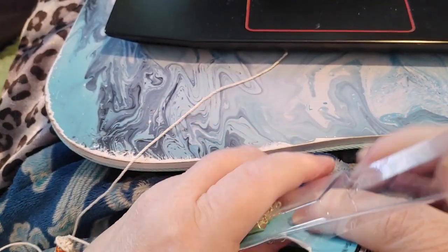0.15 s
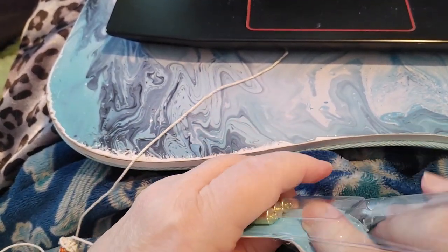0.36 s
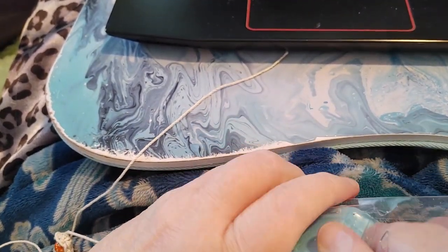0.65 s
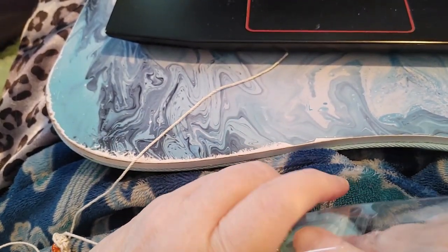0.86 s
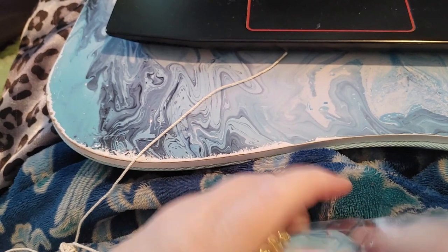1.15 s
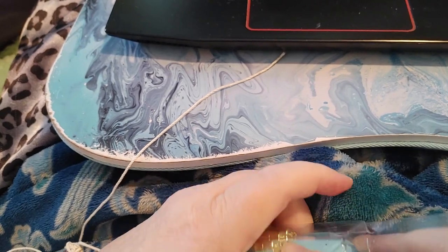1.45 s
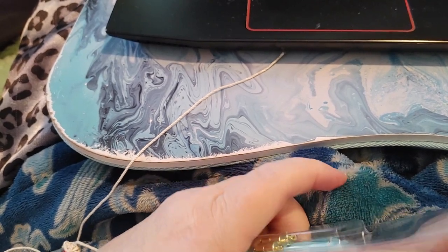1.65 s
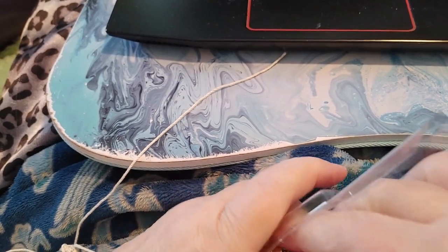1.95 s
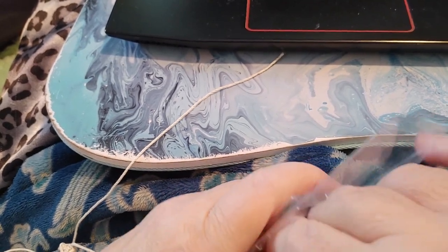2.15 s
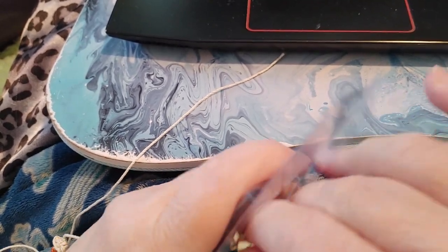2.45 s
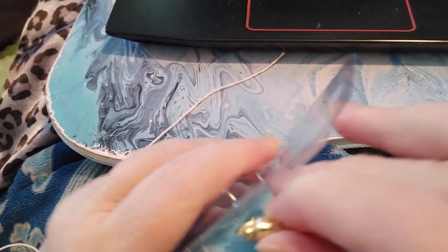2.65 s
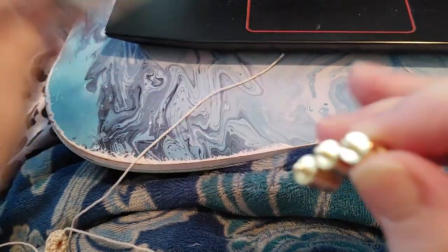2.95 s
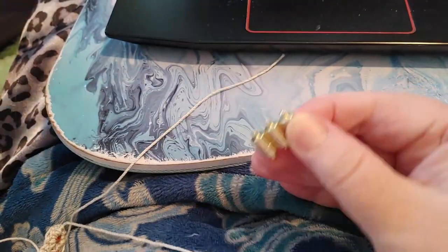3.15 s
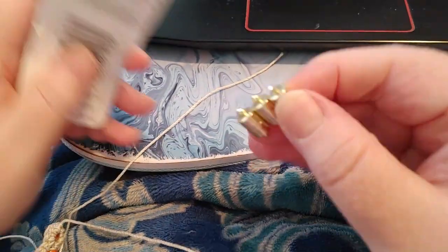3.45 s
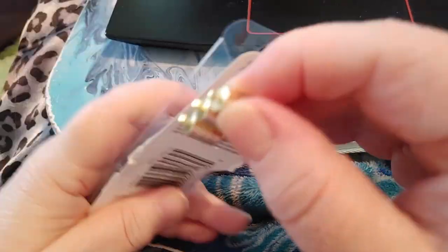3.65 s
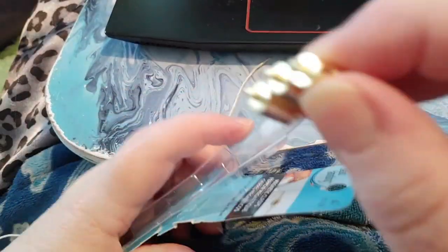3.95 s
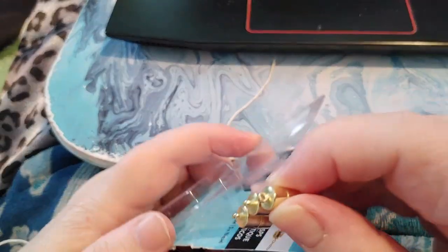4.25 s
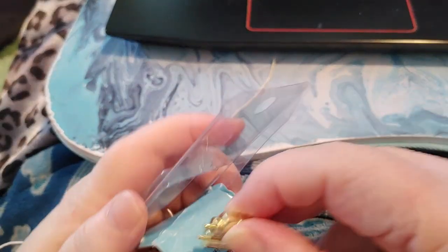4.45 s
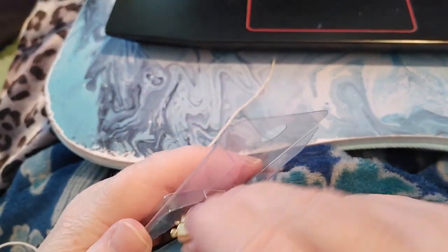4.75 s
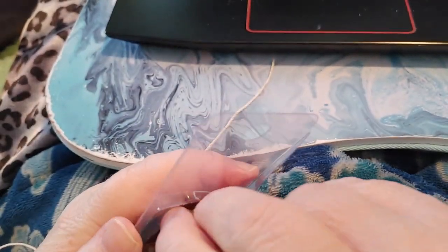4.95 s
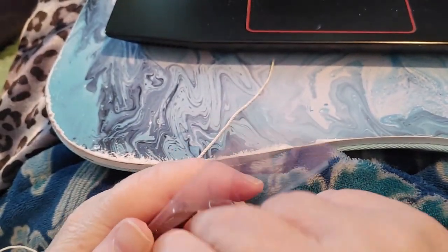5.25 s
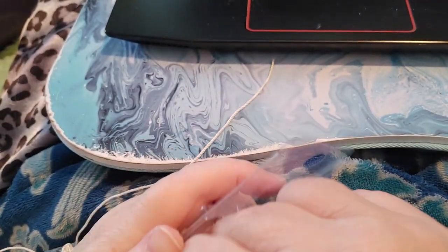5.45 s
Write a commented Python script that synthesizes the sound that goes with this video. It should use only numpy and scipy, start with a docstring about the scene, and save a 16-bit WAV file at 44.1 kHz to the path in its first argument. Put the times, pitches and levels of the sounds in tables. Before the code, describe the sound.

Hands bend a stiff clear plastic pack close by, with sharp snaps, crinkling and hollow knocks over a faint fan hum.

```python
"""Close to a phone, hands bend a stiff clear plastic pack; a laptop fan hums nearby in a quiet soft room.
A quick run of creases snaps and the film creaks twice in the first half second. The hardest snaps and hollow
knocks come between 1.1 and 2.9 s; then mostly faint crackle, one hard snap near 4.6 s and a few late creases.
Creases are ringing noise bursts, creaks are click trains, crackle is gated noise, knocks are decaying sines,
fan and air are filtered noise. The right channel runs a few milliseconds late."""
import sys
import numpy as np
from scipy import signal
from scipy.fft import rfft, irfft, next_fast_len
from scipy.io import wavfile
from scipy.ndimage import uniform_filter1d

SR = 44100
rng = np.random.default_rng(int(sys.argv[2]) if len(sys.argv) > 2 else 0)


def store_wav(level_fs):
    """Save 16-bit WAV to argv[1]."""
    pcm = np.round(np.clip(np.atleast_2d(level_fs), -1, 1) * 32767)
    wavfile.write(sys.argv[1], SR, pcm.T.astype(np.int16))


N = 247401

# Creases buckling: t/s, crack level/dB, crack colour f/Hz, thump level against the crack/dB
SNAPS = [(0.0206, -14.5, 4300.0, -17), (0.0638, -29, 4500, -20), (0.116, -25, 5800.0, -4),
         (0.2240, -23, 6500.0, -14), (0.2310, -24, 6500, -35), (0.2405, -24, 6500, -33),
         (0.3281, -24, 5800.0, -8), (0.3431, -26, 6200.0, -6), (0.3592, -23, 7000.0, -9),
         (0.3662, -25, 6500, -8), (0.3751, -23, 6500, -10), (0.3846, -22.5, 6400.0, -9.5),
         (0.3935, -25.5, 6400.0, -8), (0.401, -24, 7000, -25), (0.4116, -19, 6400.0, -37),
         (0.4203, -22, 5000.0, -32), (0.431, -12, 4300.0, -21.5), (0.6171, -25.5, 6000.0, -7),
         (0.6778, -26, 4800, -15), (0.9759, -30.5, 7600.0, -9), (1.0532, -26.5, 6100.0, -35),
         (1.0905, -31, 3000, -4), (1.1112, -7.5, 7300.0, -7.5), (1.124, -17.5, 6800.0, -13),
         (1.2487, -24.5, 2800.0, -22.5), (1.261, -22.5, 4500.0, -15), (1.2992, -4, 6700.0, -7),
         (1.3065, -4.5, 6000, -8), (1.3425, -17, 6500, -12), (1.4429, -25.5, 6700.0, -11),
         (1.6059, -25, 5300.0, -5.5), (1.6603, -17, 4200, -25), (1.6631, -13, 3600, -18),
         (1.6985, -14, 2500, -16), (1.978, -27.5, 5400.0, -15.5), (2.299, -10.5, 4100.0, -13),
         (2.3522, -22, 8300.0, -16), (2.4359, -15, 6700.0, -22.5), (2.4396, -5.5, 6600.0, -8),
         (2.6595, -31.5, 2500.0, -4.0), (2.7645, -17, 6600.0, -6), (2.8346, -17, 5500.0, -8),
         (2.8765, -20.5, 4700.0, -9), (2.9271, -39.5, 6900.0, -15), (3.0082, -22, 11000.0, -31),
         (3.0235, -38, 7500, -31), (3.918, -39.5, 5000.0, -5), (4.0365, -30.5, 2600.0, -18),
         (4.32, -33.5, 4680, -6.5), (4.4438, -43, 2380, -22), (4.4923, -36, 2700, -19),
         (4.5935, -5, 5600, -11), (4.6507, -30.0, 4800.0, -10), (4.8003, -33, 6600.0, -14),
         (4.9375, -25, 2500.0, -10), (5.1054, -35.5, 5900.0, -13), (5.206, -40, 2500, -20),
         (5.242, -26, 4200.0, 2.5), (5.3185, -33, 6500, -25), (5.3815, -27, 5500.0, -8),
         (5.3885, -29, 5500, -8), (5.4152, -23, 5700.0, -8.5)]
# Pack and fan at the microphones: t/s, drop of the pack on the right/dB, fan level before its left-right tilt/dB
PLACE = [(0, 0.5, -69), (1.1, 3, -65.5), (2.3, 3, -63.5), (2.9, 6.5, -63), (3.2, 10, -64.5),
         (3.6, 7.5, -67.5), (4.3, 7, -61), (5.61, 6, -63.5)]


def amp(db):
    """Amplitude factor of a level in dB."""
    return 10 ** (np.asarray(db) / 20)


def unit(x):
    """x scaled to an rms of one."""
    return x / np.sqrt(np.mean(x ** 2) + 1e-20)


def along(points, hz):
    """Read a curve of (f/Hz, value) points on a log frequency axis."""
    f, v = np.transpose(points)
    return np.interp(np.log(hz + 1), np.log(f + 1), v)


def curves(rows):
    """One value per sample for each column after the time."""
    s, *cols = np.transpose(rows)
    return [np.interp(np.arange(N) / SR, s, c) for c in cols]


def filtered(x, response):
    """Filter x by a complex response of frequency."""
    m = next_fast_len(x.shape[-1] + 4096)
    spectrum = rfft(x, m) * response(np.fft.rfftfreq(m, 1 / SR))
    return irfft(spectrum, m)[..., :x.shape[-1]]


def mode(f, hz, width_hz):
    """Response of one causal resonance, one at its peak."""
    return 1j * f * width_hz / (hz * hz - f * f + 1j * f * width_hz)


def two_mics(pair):
    """Mix two unrelated signals so that the microphones agree most in the bass and differ in the treble."""
    # Likeness of the two microphones: f/Hz, correlation
    likeness = [(300, 0.77), (1200, 0.36), (2500, 0.17), (6000, 0.4)]

    def mid_and_side(hz):
        turn = np.arccos(np.clip(along(likeness, hz), 0, 1)) / 2
        return np.array([np.cos(turn), np.sin(turn)])

    mid, side = filtered(pair, mid_and_side)
    return np.array([mid + side, mid - side])


def patchy(depth_db, frames, size):
    """Two noises whose colour drifts in narrow patches of random gain, shared by both."""
    z = signal.stft(rng.standard_normal((2, N)), nperseg=size)[2]
    field = uniform_filter1d(rng.standard_normal(z.shape[1:]), size=3, axis=0)
    field = uniform_filter1d(field, frames, axis=1)
    noise = signal.istft(z * amp(depth_db * unit(field)), nperseg=size)[1]
    return unit(noise[:, :N])


def click(hz, thump_db, after_db=-27, after_t60=0.065):
    """A buckling crease: a crack round its colour, a dull push of the card and an afterrustle."""
    t = np.arange(4096) / SR
    noise = rng.standard_normal((2, 2, len(t)))
    # every fold leaves differently sized panels free to ring
    panels = np.minimum(hz * np.exp(.3 * rng.standard_normal(5)), 12500)
    blow = (1 - np.exp(-t / .0006)) ** 2 * amp(-60 * t / .0048)
    afterrustle = amp(after_db - 60 * t / after_t60)
    edge = hz / 15000  # small stiff creases also spit at the very top

    def plastic(f):
        body = mode(f, hz, .8 * hz) ** 2
        top = edge * mode(f, 11500, 3500)
        return body + top + sum(mode(f, p, .04 * p) for p in panels)

    crack = filtered(noise[0] * (blow + afterrustle), plastic)
    thump = filtered(noise[1] * blow ** 2, lambda f: mode(f, 600, 1800))
    head = len(t) // 20  # levels are set on the opening burst
    return crack / np.std(crack[:, :head]) + amp(thump_db) * thump / np.std(thump[:, :head])


def snaps():
    """Single creases giving way, each with its own burst of crack and thump."""
    crest_db = 9.5  # allowance for the peak of a crack over its rms
    out = np.zeros((2, N + SR))
    for s, db, hz, thump_db in SNAPS:
        out[:, round(s * SR):][:, :4096] += amp(db - crest_db) * click(hz, thump_db)
    return out[:, :N]


def creaks():
    """Film sticks and slips on film: like clicks in a train whose rate drifts while it swells and fades."""
    # Creaks: start t/s, end t/s, slip rate at start f/Hz, at end f/Hz, level/dB, colour f/Hz
    slip_trains = [(0.301, 0.323, 430, 400, -39, 7000), (.492, 0.553, 430, 900, -33, 5360)]
    out = np.zeros((2, N))
    for start, end, rate0, rate1, db, hz in slip_trains:
        part = np.linspace(0, 1, round((end - start) * SR))
        rate = rate0 + (rate1 - rate0) * part ** 2
        slips = np.diff(np.floor(np.cumsum(rate) / SR), prepend=-1)
        swell = np.sqrt(np.abs(np.sin(np.pi * part)))
        train = slips * swell * amp(db + 2 * rng.standard_normal(len(part)))
        sound = signal.fftconvolve(train[None], click(hz, -25, after_db=-30), axes=1)
        out[:, round(start * SR):][:, :sound.shape[1]] += sound
    return out


def crackle():
    """Tiny creases of unequal size gate a rubbing noise that rings film and card; snaps rustle more evenly."""
    # Fingers pressing the pack: peak t/s, crackle level/dB, time to swell 20 dB/s,
    # time to fade 20 dB/s, card level against the film/dB
    squeezes = [(0.045, -40, .4, .04, -5), (.11, -43, .05, .13, -4), (.235, -43, .04, .06, -11),
                (.455, -46, .05, .1, -18), (.524, -38, .1, .065, -6), (.673, -33, .058, .035, -12),
                (.845, -38, .07, .06, -8), (1.075, -43, .15, .05, -22), (1.285, -34, .045, .05, 0),
                (1.312, -24, .012, .07, -2), (1.345, -29, .08, .033, -1), (1.555, -43, .12, .068, -3),
                (1.668, -26, .022, .03, -8), (1.706, -27, .012, .035, -4), (1.85, -53, .2, .04, 4),
                (1.94, -47, .03, .06, 4), (2.073, -44, .13, .025, -10), (2.35, -42, .15, .02, -12),
                (2.64, -49, .17, .11, -2), (2.805, -40, .07, .05, -12), (2.836, -34, .025, .05, -5),
                (3.382, -59, .035, .3, -12), (3.62, -55, .01, .5, -6), (3.74, -49, .04, .09, -7),
                (4.03, -49, .2, .04, -3), (4.214, -54, .035, .2, -15), (4.35, -53, .08, .25, -8),
                (4.862, -49, .22, .05, -9), (4.96, -56, .06, .2, 0), (5.268, -41, .09, .05, -2),
                (5.315, -44, .15, .03, -14), (5.531, -43, .085, .09, -10)]
    # Colour of the film: f/Hz, relative level/dB per Hz
    film_colour = [(1200, -24.5), (3000, -9), (4500, 2), (7500, 3.5), (10000, -5.5), (12000, -6.5)]
    # Colour of the card: f/Hz, relative level/dB per Hz
    card_colour = [(80, -22), (450, -4), (1400, -0.5), (2500, 4), (3600, -2), (7000, -31)]
    sizes = amp(5 * np.clip(rng.standard_normal(N), -3, 2.1))
    ticks = (rng.random(N) < 700 / SR) * sizes  # about 700 tiny creases per second
    tick = amp(-60 * np.arange(600) / SR / .006)  # each dies 60 dB in 6 ms
    grain = unit(signal.fftconvolve(ticks, tick)[:N])
    out = 0
    for rows, even in [(squeezes, .7), (settling(), 2.2)]:  # even: steady rub under the grain
        film_gain, card_gain = handling(rows)
        film_rub = (even + grain) * patchy(6, frames=12, size=384)
        film = unit(filtered(film_rub, lambda f: amp(along(film_colour, f))))
        card_rub = (even + grain) * patchy(6.5, frames=8, size=512)
        card = unit(filtered(card_rub, lambda f: amp(along(card_colour, f))))
        out = out + film_gain * film + card_gain * card
    return out


def settling():
    """Each snap leaves the film rustling, as a short squeeze of its own."""
    delay_s, rise_s, fade_s = .005, .014, .048  # wait after the snap; seconds per 20 dB up and down
    base_db, grows = -22, 1.35  # crackle level; dB gained per dB of snap
    base_card_db, card_follows = -4, .3  # card against film; dB of card per dB of the snap's thump
    rows = []
    for s, db, _, thump_db in SNAPS:
        card_db = base_card_db + card_follows * thump_db
        rows.append((s + delay_s, base_db + grows * db, rise_s, fade_s, card_db))
    return rows


def handling(rows):
    """Strength of film and card crackle: the powers of squeezes that swell and fade add up."""
    rest_db = -83  # the pack merely held
    t = np.arange(0, N / SR + .002, .001)
    s, db, rise, fade, card_db = np.transpose(rows)[:, :, None]
    steps = np.where(t < s, (s - t) / rise, (t - s) / fade)
    power = amp(db - 20 * steps) ** 2
    both = [power.sum(axis=0), (power * amp(card_db) ** 2).sum(axis=0)]
    return [np.interp(np.arange(N) / SR, t, np.sqrt(p + amp(rest_db) ** 2)) for p in both]


def knocks():
    """The air-filled pack rings briefly at a low pitch with a weaker second mode."""
    # The hollow pack knocked: t/s, level/dB, ring f/Hz
    hollow_hits = [(.431, -26, 1500), (1.112, -22, 950), (1.3075, -16, 480), (1.324, -14, 620),
                   (1.342, -15, 480), (1.701, -27, 420), (2.8355, -19, 620), (4.597, -13, 950)]
    cycles, overtone = 7, 1.6  # cycles to die 60 dB; pitch of the second mode over the first
    out, t = np.zeros(N + SR), np.arange(2048) / SR
    for s, db, hz in hollow_hits:
        first = np.sin(2 * np.pi * hz * t)
        second = .35 * np.sin(2 * np.pi * overtone * hz * t + 2 * np.pi * rng.random())
        envelope = amp(db - 60 * t * hz / cycles) * (1 - np.exp(-t / .0006))
        out[round(s * SR):][:len(t)] += envelope * (first + second)
    return out[:N]


def room_tone():
    """The fan's air noise sings in its duct, to the left, over a broad soft rumble."""
    # Duct resonances: f/Hz, width f/Hz, relative level/dB
    duct_modes = [(225, 70, -10), (440, 60, -15), (745, 60, -4), (960, 120, 1), (1090, 140, -7)]
    # Colour of the room's air: f/Hz, relative level/dB per Hz
    air_colour = [(30, -16), (70, -7.5), (300, -6.5), (580, -14), (2000, -27), (6000, -35), (12000, -30)]

    def duct(f):
        return sum(amp(db) * np.abs(mode(f, hz, w)) ** 2 for hz, w, db in duct_modes)

    fan = unit(filtered(patchy(4, frames=6, size=2048), duct)) * amp(curves(PLACE)[1])
    air = unit(filtered(rng.standard_normal((2, N)), lambda f: amp(along(air_colour, f))))
    # left and right levels in dB
    return two_mics(fan) * amp([[4], [-1.5]]) + two_mics(air) * amp([[-67.5], [-70]])


def scene():
    """The pack close by, leaning left by a shifting amount, over the room."""
    pan_db = curves(PLACE)[0]
    pack = two_mics(snaps() + creaks() + crackle()) + knocks()
    return pack * amp(np.array([0 * pan_db, -pan_db])) + room_tone()


def record(dry):
    """Soft overload, microphone colour, a late right channel and the band limit."""
    # Microphone response: f/Hz, level/dB
    mic_colour = [(40, -12.5), (110, 0.5), (4200, 1), (5400, -2), (12400, 0.5), (13000, -18.5),
                  (15500, -13), (16400, -21)]
    late_s, top_hz = .00415, 16900
    lag = np.array([[0], [late_s]])
    soft = .9 * np.tanh(dry / .9)

    def microphones(hz):
        delay = np.exp(-2j * np.pi * hz * lag)
        return amp(along(mic_colour, hz)) * delay * (hz < top_hz)

    return filtered(soft, microphones)


dry = scene()
out = record(dry)
store_wav(out)
```